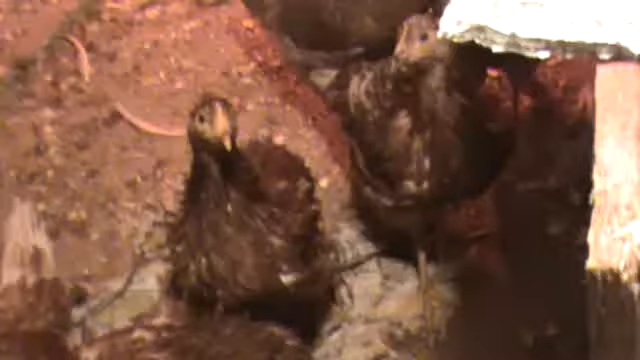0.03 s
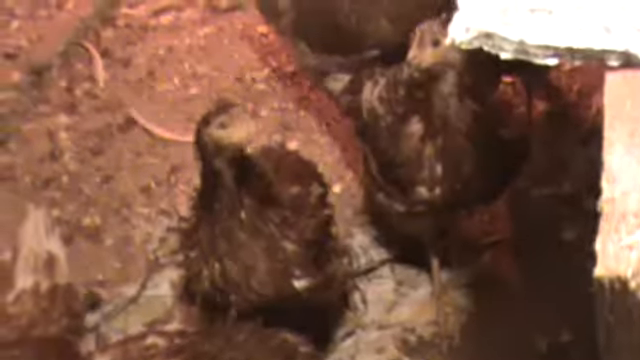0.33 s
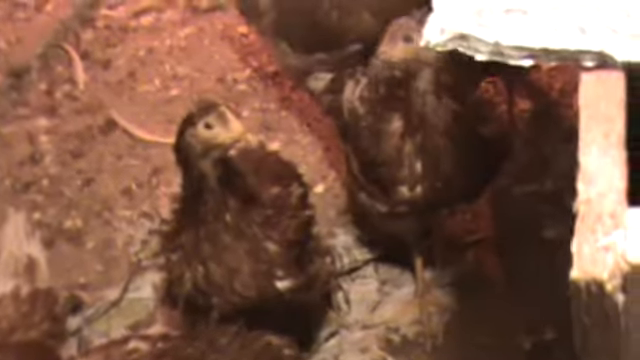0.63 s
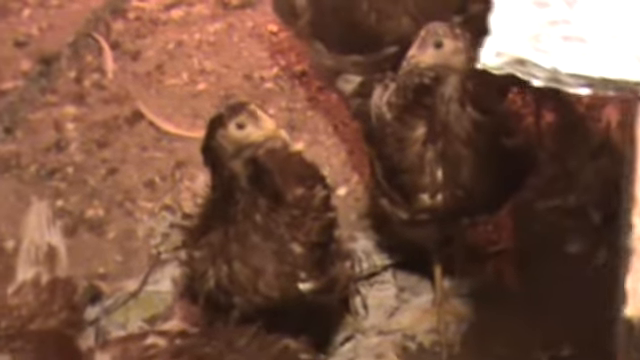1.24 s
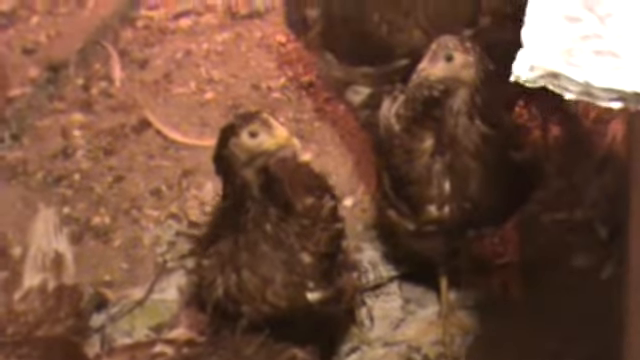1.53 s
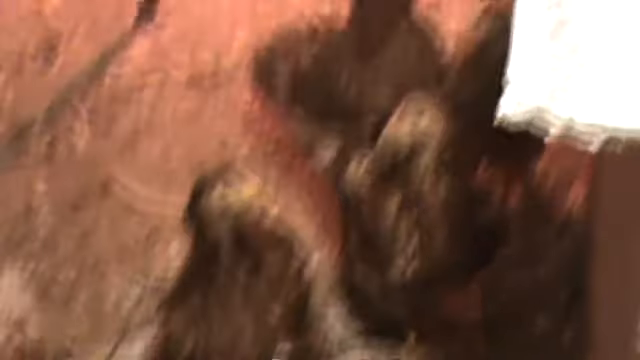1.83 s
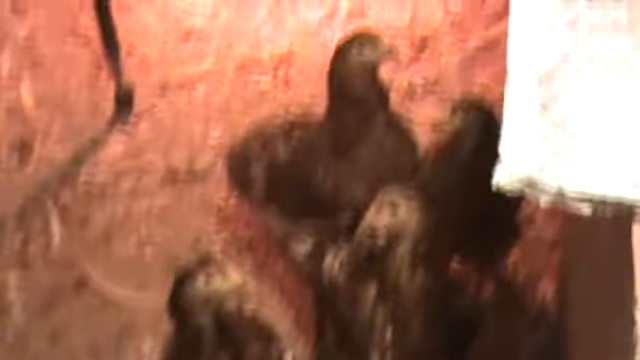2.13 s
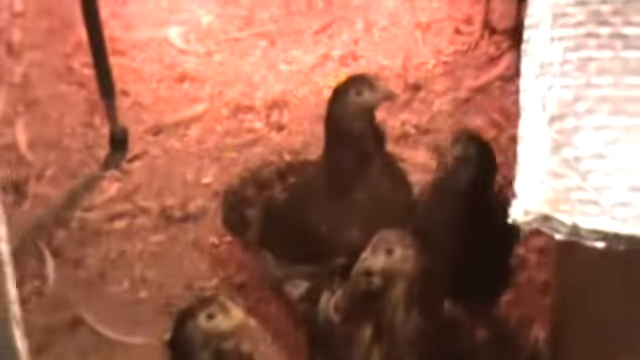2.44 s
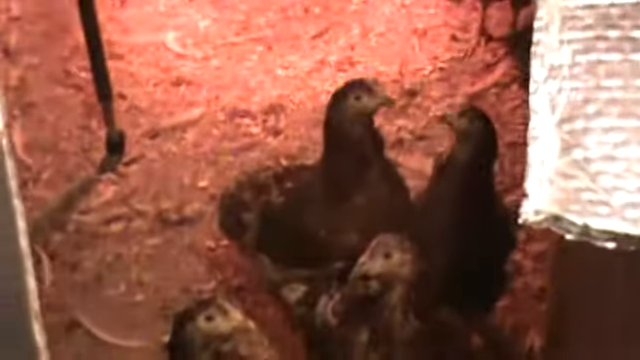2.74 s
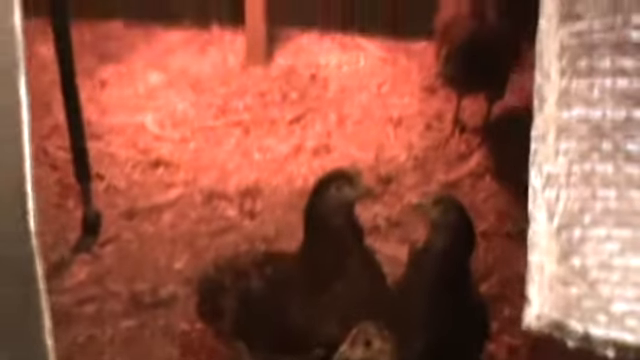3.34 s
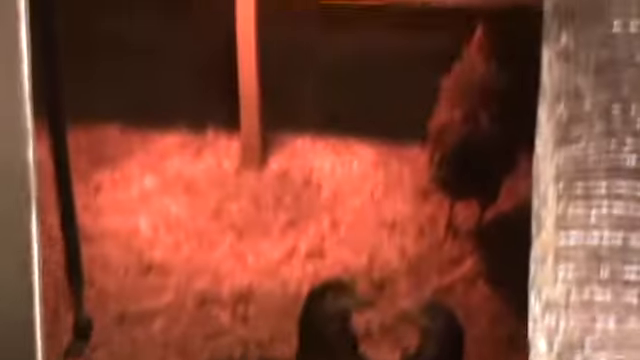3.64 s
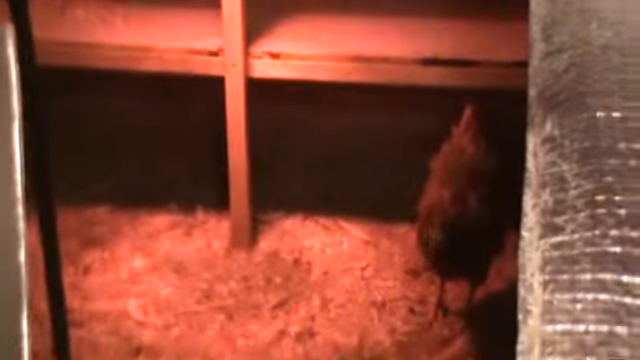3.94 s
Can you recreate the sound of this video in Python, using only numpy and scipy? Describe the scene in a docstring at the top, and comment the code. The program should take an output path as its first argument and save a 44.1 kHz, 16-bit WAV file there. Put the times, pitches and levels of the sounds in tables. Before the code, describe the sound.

Steady, booming air from a fan fills a chicken shed, with a low hum and a thin whine that weakens about halfway as the microphone shifts. Dry bedding gives a few faint ticks under the birds' feet.

```python
"""A ventilation fan runs steadily in a shed where young chickens sit quietly.
Its turbulent air booms in the shed's resonances, over a low hum and a thin motor whine, and dry
litter ticks faintly under the birds' feet. A hand-held camera with two close microphone ports
fades in just after the start. As it moves, the booms and hum shift in balance and the whine fades."""
import sys
import numpy as np
from scipy import signal
from scipy.fft import rfft, irfft
from scipy.io import wavfile
from scipy.ndimage import uniform_filter1d

SR = 44100
rng = np.random.default_rng(int(sys.argv[2]) if len(sys.argv) > 2 else 0)


def inscribe(sig):
    """Save sig as 16-bit PCM at rate SR to the path in sys.argv[1].

    A 1-D sig is mono; a 2-D sig holds one channel per row.
    Samples are clipped to [-1, 1] before scaling.
    """
    pcm = np.round(np.clip(np.atleast_2d(sig).T, -1, 1) * 32767)
    wavfile.write(sys.argv[1], SR, pcm.astype(np.int16))


N = 176400


def undb(db):
    """Decibels to gain."""
    return 10 ** (np.asarray(db) / 20)


def curve_at(table, hz):
    """Read a table on a log-frequency axis."""
    points, values = np.array(table, float).T
    return np.interp(np.log(np.maximum(hz, 1)), np.log(points), values)


def drift(per_s):
    """Smooth random motion with a spread of 1."""
    hold = max(int(SR / per_s), 2)
    steps = np.repeat(rng.standard_normal(N // hold + 2), hold)
    smooth = uniform_filter1d(uniform_filter1d(steps, hold), hold)[:N]
    return smooth / np.std(smooth)


def camera_move(before, after, midpoint_s=2.3, length_s=1):
    """Crossfade from before to after as the camera moves."""
    progress = np.clip((np.arange(N) / SR - midpoint_s) / length_s + .5, 0, 1)
    return before + progress * (after - before)


def mic_ports(hz):
    """Complex gain of the two ports: the left hears the fan a little later and louder."""
    # Phase between the ports. Each row: frequency in Hz, left lead in radians (negative is a lag).
    left_lead = [(30, -.06), (140, -0.36), (340, -0.67), (700, -0.83), (1500, -0.58), (3400, -.38),
                 (6500, -0.059), (15000, -0.051)]
    # Stereo balance. Each row: frequency in Hz, left minus right in dB.
    balance = [(60, 1.6), (380, 1.2), (700, 2.5), (1300, 1.6), (4400, 0.3), (8000, 0)]
    left = undb(curve_at(balance, hz) / 2) * np.exp(1j * curve_at(left_lead, hz) / 2)
    return np.array([left, 1 / left]).reshape(2, -1)


def air_rush(level_db=-32.4, flutter_db=0.26, swell_db=-0.19):
    """The fan's turbulent air, coloured by the shed's resonances."""
    # Tone of the rush. Each row: frequency in Hz, relative spectral level in dB.
    rush_eq = [(22, -35), (49, -7), (69, -3.5), (107, -6.7), (150, -2.5), (200, -7.5), (280, -6),
               (560, -7.5), (800, -9.4), (1010, -15), (1400, -17.5), (2800, -25.7), (3700, -27.5),
               (5800, -33.5), (8200, -35.8), (10500, -43), (15000, -44.5)]
    # The shed's resonances and notches. Each row: centre in Hz, width in Hz,
    # gain in dB before the camera moves, gain in dB after.
    booms = [(57, 10, 4.5, 1.5), (80, 20, 0, 2.5), (158, 22, 3.3, 6.5), (196, 36, -2.5, -4.5),
             (259, 14, 2.5, 1.5), (315, 50, 3.5, 2.5), (366, 20, -4.5, -4), (392, 20, 2.5, 2.5),
             (462, 50, 1.5, 3.5), (700, 60, -3.5, -1.5), (770, 40, 1, 1.5), (900, 50, 4.5, 5),
             (1261, 70, 7, 3), (1320, 40, 0, 4), (2065, 50, 2.5, 2), (2299, 45, 1.5, 5),
             (3460, 45, 1.5, 2.5), (3700, 1200, 0, 1.3), (4953, 60, 2, 4.5)]
    # How alike left and right sound: wide in the mids, nearly mono in the top treble.
    # Each row: frequency in Hz, coherence from 0 to 1.
    coherence = [(40, .99), (160, .99), (500, .92), (900, .85), (1600, .59), (4000, .52), (5800, .68),
                 (7200, .93), (10000, .94), (13000, .985)]
    hz = np.arange(N // 2 + 1) * SR / N
    alike = np.sqrt(np.clip(curve_at(coherence, hz), 0, 1))
    mid, side = rfft(rng.standard_normal((2, N)))
    spectrum = np.sqrt(1 + alike) * mid + np.sqrt(1 - alike) * side * np.array([[1], [-1]])
    spectrum = spectrum * undb(curve_at(rush_eq, hz)) * mic_ports(hz)
    centre, width, before_db, after_db = np.array(booms, float).T
    bells = 1 / (1 + (2 * (hz[:, None] - centre) / width) ** 2)
    before, after = (irfft(spectrum * undb(bells @ db), N) for db in (before_db, after_db))
    air = camera_move(before, after)
    turbulence_db = flutter_db * drift(per_s=16) + swell_db * drift(per_s=3.1)
    return air / np.std(air) * undb(level_db + turbulence_db)


def fan_hum():
    """Low tones of fan and motor that waver in strength and phase."""
    # Hum tones. Each row: pitch in Hz, level in dB before the camera moves, level in dB after,
    # waver as a share of the steady tone.
    tones = [(137, -44.4, -42.2, 0.3), (600, -55.5, -49.5, 0.48), (616, -51.5, -56, 0.53)]
    t = np.arange(N) / SR
    hum = 0
    for hz, before_db, after_db, depth in tones:
        wobble = drift(per_s=7.04) + 1j * drift(per_s=6.95)
        waver = (1 + depth * wobble) / np.sqrt(1 + 2 * depth ** 2)
        gain = np.sqrt(2) * undb(camera_move(before_db, after_db))
        hum = hum + gain * np.real(mic_ports(hz) * waver * np.exp(2j * np.pi * hz * t))
    return hum


def motor_whine(pitch_hz=736.6, wander_hz=0.3, flicker_db=.3):
    """One clean, nearly steady motor tone that fades as the camera moves."""
    # The whine's fade. Each row: time in seconds, level in dB.
    fade = [(.2, -38.7), (1.25, -38.2), (2.05, -39.5), (2.35, -43), (3.0, -43.8), (4, -46.8)]
    t = np.arange(N) / SR
    phase = 2 * np.pi * np.cumsum(pitch_hz + wander_hz * drift(per_s=5.02)) / SR
    level_db = np.interp(t, *np.array(fade).T) + flicker_db * drift(per_s=8.1)
    return np.sqrt(2) * undb(level_db) * np.real(mic_ports(pitch_hz) * np.exp(1j * phase))


def litter_ticks(centre_hz=6000, decay_s=.0022):
    """Dry bedding ticks under the birds' feet: tiny bursts of bright, octave-wide noise."""
    # Footfalls. Each row: start in seconds, level at the attack in dB.
    ticks = [(.946, -46), (.952, -48), (1.014, -45.5), (1.061, -42), (3.488, -47)]
    t = np.arange(N) / SR
    edges_hz = [centre_hz / np.sqrt(2), centre_hz * np.sqrt(2)]
    band = signal.butter(2, edges_hz, "bandpass", fs=SR, output="sos")
    crackle = signal.sosfilt(band, rng.standard_normal(N))
    envelope = sum(undb(db) * (t >= at) * np.exp(-np.abs(t - at) / decay_s) for at, db in ticks)
    return envelope * crackle / np.std(crackle)


def scene():
    """The fan and the resting birds, in stereo."""
    return air_rush() + fan_hum() + motor_whine() + litter_ticks()


def record(dry):
    """The sound fades in quickly, a little low at first, then settles; the top treble is cut off."""
    start_s, fade_s = 0.17, 0.022
    low_db, settle_s = -2, .4
    elapsed = np.maximum(np.arange(N) / SR - start_s, 0)
    gain = np.minimum(elapsed / fade_s, 1) * undb(low_db * np.exp(-elapsed / settle_s))
    high_cut = signal.ellip(10, .1, 80, 14500, fs=SR, output="sos")
    return signal.sosfilt(high_cut, dry * gain)


dry = scene()
out = record(dry)
inscribe(out)
```